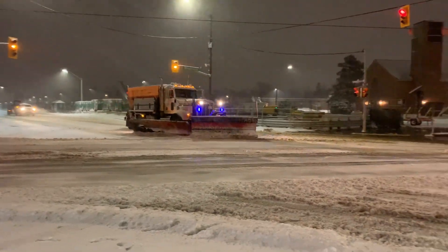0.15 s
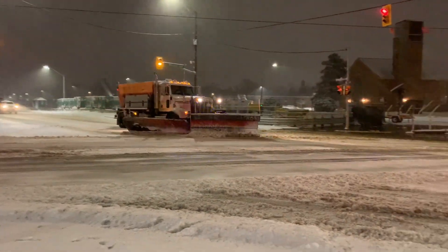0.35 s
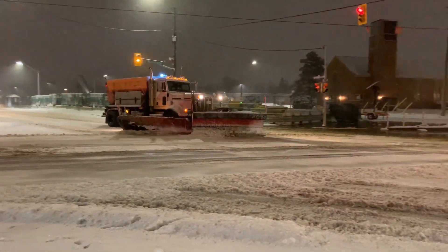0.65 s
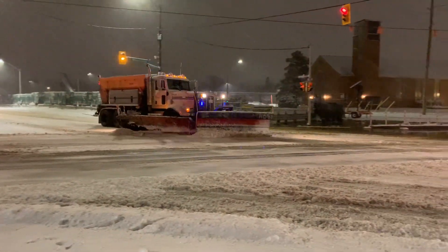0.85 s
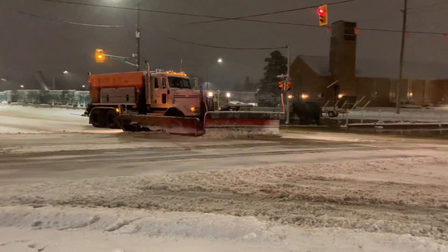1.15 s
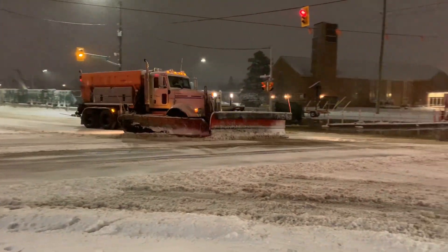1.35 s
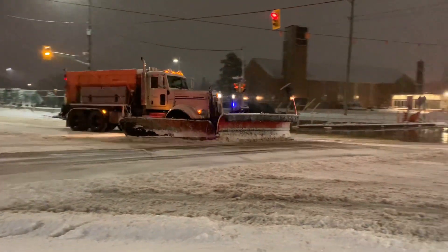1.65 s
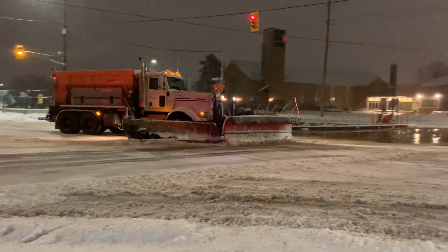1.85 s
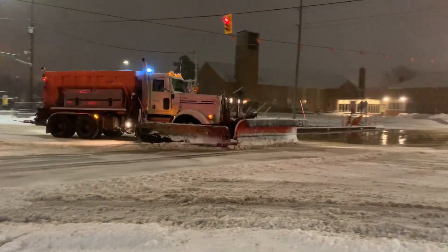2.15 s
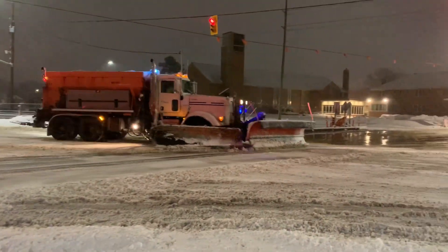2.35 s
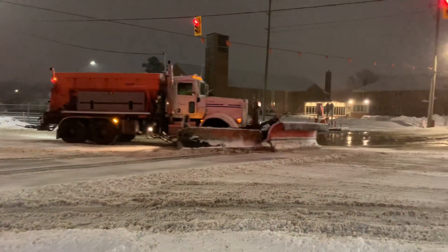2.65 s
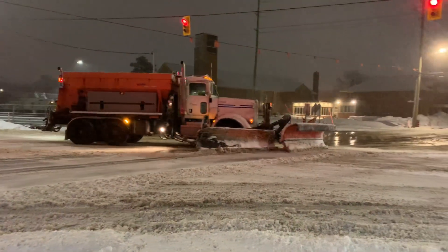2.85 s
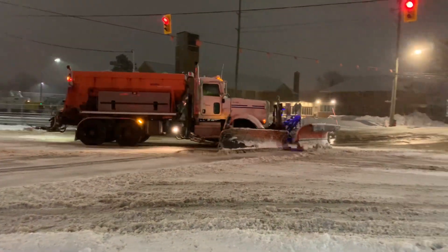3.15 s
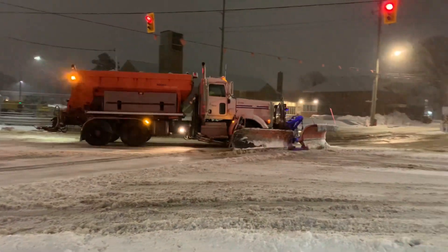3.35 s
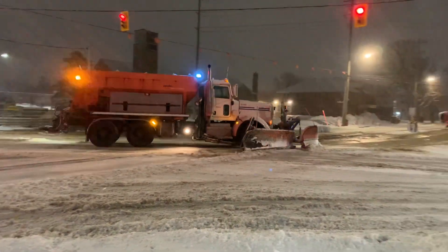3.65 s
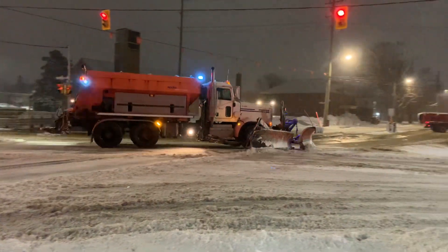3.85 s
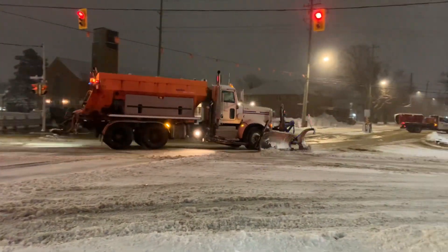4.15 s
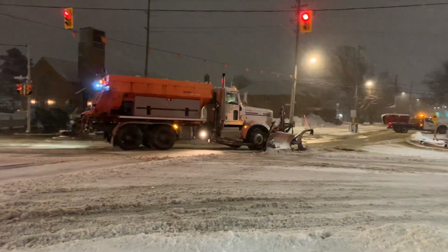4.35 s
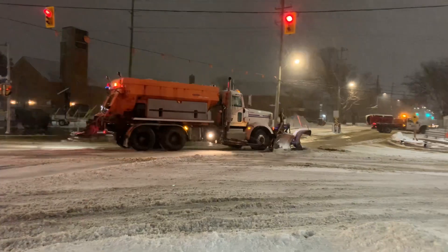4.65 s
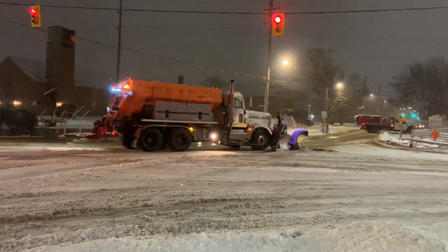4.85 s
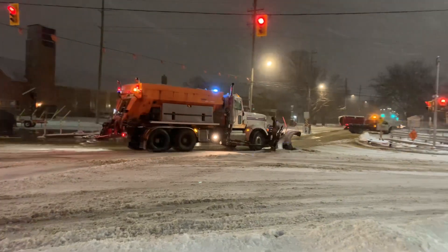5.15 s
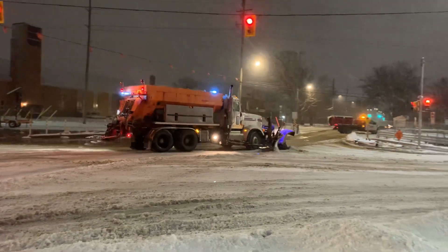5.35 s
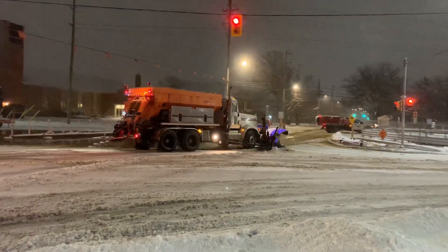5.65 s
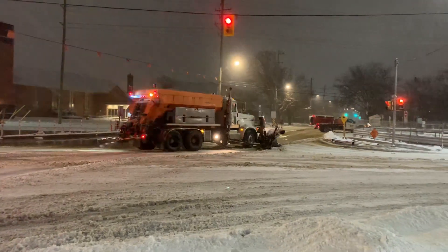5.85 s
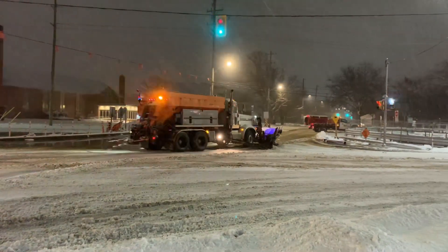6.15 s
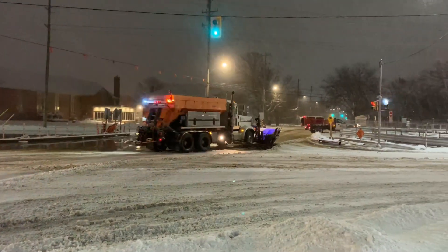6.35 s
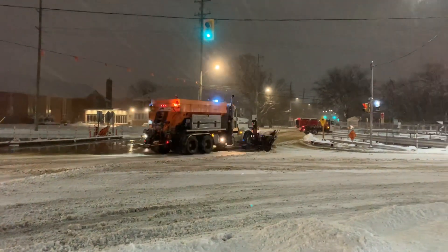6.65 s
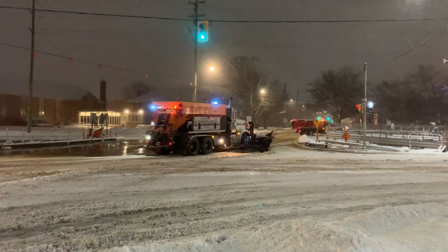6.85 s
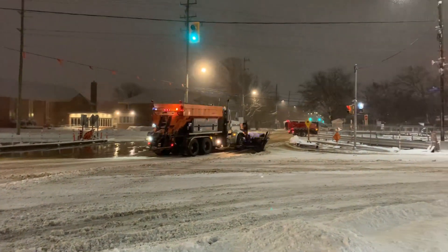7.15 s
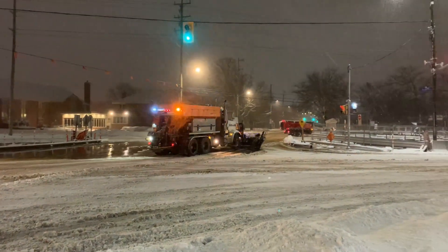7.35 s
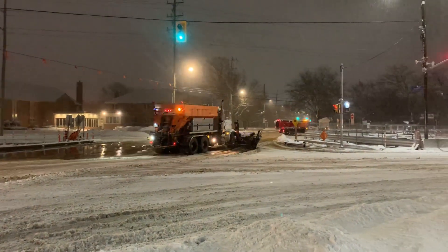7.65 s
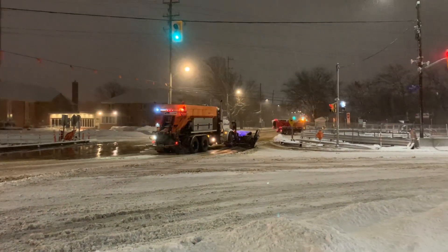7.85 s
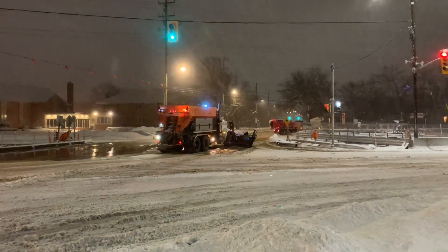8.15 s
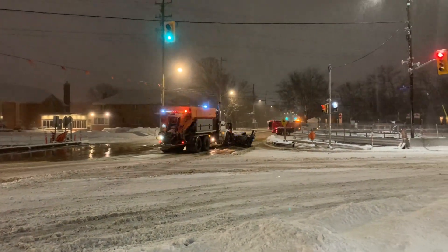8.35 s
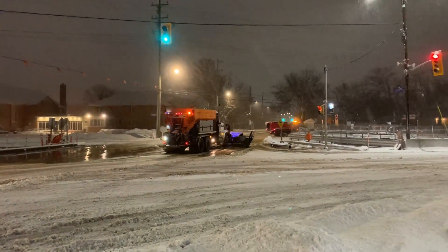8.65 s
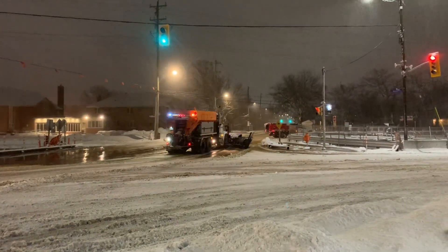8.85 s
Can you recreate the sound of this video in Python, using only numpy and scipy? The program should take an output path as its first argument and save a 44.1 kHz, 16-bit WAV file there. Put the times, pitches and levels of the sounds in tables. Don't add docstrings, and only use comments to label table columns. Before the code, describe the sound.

A phone outdoors on a windy, snowy night picks up a plow truck crossing an intersection. From 0 to 1.3 seconds, violent gusts rumble, crackle and pop on the microphone, mixed with hard blade bangs and coarse steel scraping over grit. From 1.3 to 2.9 the grinding, diesel hiss and spraying snow are steadier over low wind; around 3 another cluster of pops and bangs hits. A few chain clinks follow at 3.2 to 4. At 4.5 an air valve releases a bright, whistling quarter-second blast, with a weak puff at 5.5. Two dry snaps come near 5.4, low plate groans and knocks around 5.8, and chains jingle from 6.3 to 7. Wind pops thin out. From 7.5 to 9 the blade's resonant groaning grows, while a wavering gear whine rises around 320 to 410 hertz, surging as the truck pulls away.

```python
import sys
import numpy as np
from scipy import signal
from scipy.fft import rfft, irfft, next_fast_len
from scipy.io import wavfile
from scipy.ndimage import uniform_filter1d

SR = 44100
rng = np.random.default_rng(int(sys.argv[2]) if len(sys.argv) > 2 else 0)


def boost_factor(decibels):
    exponent = np.asarray(decibels, float) / 20
    return 10 ** exponent


def bounce(signal):
    frames = np.transpose(np.atleast_2d(signal))
    limited = np.clip(frames, -1, 1)
    pcm = np.round(limited * 32767).astype(np.int16)
    wavfile.write(sys.argv[1], SR, pcm)


N = 396459
T = np.arange(N) / SR
SIZE = next_fast_len(N)
HZ = np.fft.rfftfreq(SIZE, 1 / SR)

# [t/s, blade pressure level/dB, engine effort level/dB, thrown snow level/dB]
TRUCK_PATH = [(0, -20, -48.5, -57), (.17, -25, -42, -50.5), (.3, -28, -52, -56), (.55, -26, -53, -51.5),
              (.88, -29, -49, -50), (1.1, -24.5, -49, -49), (2.08, -23.5, -44.5, -48.5),
              (2.4, -27.5, -42.5, -49.5), (3.43, -27, -41, -51.5), (4.21, -30, -40.5, -50),
              (4.7, -27.5, -43.5, -54), (5.3, -25, -42.5, -56), (6.07, -26.5, -48.5, -54),
              (6.85, -27.5, -49, -56), (7.2, -25.5, -44, -61), (7.65, -20, -48.5, -58),
              (8.45, -19.5, -45.5, -47), (9, -19, -51.5, -72)]
# [f/Hz, width f/Hz, level/dB]
PLATE_MODES = [(268, 67, 0.5), (342, 59, 1), (490.6, 54, 1.5), (605, 36, 1.5), (689, 117, -4),
               (159.4, 14, 2)]
# [f/Hz, level/dB]
SCRAPE_TONE = [(470, -25), (800, -5.5), (978, -7.5), (1270, 1), (1540, -9.5), (1770, -5), (2150, -11.5),
               (2390, -8.5), (2660, -14), (2890, -11), (3600, -18), (4680, -25), (7920, -120)]
# [f/Hz, level/dB]
HISS_TONE = [(2500, -37), (3300, -7.5), (4200, -1), (5700, -5), (6800, -5), (7600, -8.5), (8800, -32)]
# [f/Hz, level/dB]
SPRAY_TONE = [(6500, -30), (7600, -10), (8600, -1), (9500, -1), (11000, -2), (12700, -2), (14000, -1),
              (14900, -7)]
# [t/s, rumble level/dB, eddies level/dB]
WIND_LEVELS = [(0, -28.5, -16.5), (.4, -25, -32.5), (.85, -17, -23), (1.4, -20, -24), (1.75, -19.5, -25),
               (2.1, -20.5, -23.5), (2.7, -18.5, -21), (3.4, -14, -33), (4.0, -21, -34), (4.35, -17, -46),
               (4.9, -24.5, -67), (5.6, -24, -45), (6.5, -23.5, -42), (7.1, -22, -27.5), (7.7, -19, -55),
               (8.2, -18.5, -70), (9, -17, -80)]
# [t/s, lift level/dB, half length t/s]
RUMBLE_SWELLS = [(0.21, 13.5, 0.11), (0.12, 3, 0.023), (0.565, 8, 0.082), (.77, 3.5, 0.11),
                 (1.08, 6.5, 0.046), (1.213, 7, 0.042), (1.453, 5.5, 0.088), (1.877, 10, 0.02),
                 (1.902, -14, .02), (1.978, 10, 0.014), (2.247, 7, 0.056), (2.308, -13, 0.022),
                 (2.351, 12, 0.015), (2.54, 6.5, 0.075), (2.765, 4.5, 0.05), (2.987, 4.5, 0.085),
                 (3.242, 3.5, 0.026), (3.62, 3, 0.079), (4.144, 7, 0.055), (4.802, 9, 0.039),
                 (5.027, 13, 0.057), (5.268, 5.5, 0.13), (6.065, 5, 0.068), (6.38, 10, 0.044),
                 (6.611, 9, 0.027), (6.864, 8, 0.074), (7.199, 2.5, 0.024), (7.319, 10, 0.011),
                 (7.99, 2.5, 0.088), (8.457, 4, 0.036)]
# [start t/s, hold t/s, large eddies level/dB, small eddies relative level/dB]
GUST_BURSTS = [(0.005, 0.016, -13, 4), (0.046, 0.0094, -19.5, 10.5), (0.108, 0.038, -19.5, 1),
               (0.173, 0.13, -21.5, 4), (0.168, .006, -20, 6), (0.189, .004, -16, 4),
               (0.219, 0.019, -13.5, 2.5), (0.25, 0.031, -18.5, 7), (0.299, .01, -23, 8),
               (0.312, .006, -16.5, 5), (0.33, .002, -16, -6), (0.458, .02, -22, -6),
               (0.489, 0.06, -13.5, -6), (0.572, 0.035, -17.5, 0), (.612, 0.024, -19, 8),
               (0.651, 0.17, -16.5, -8), (1.029, 0.004, -14.5, 8), (1.058, 0.022, -24.5, 5),
               (1.104, .01, -22, -3), (1.131, 0.043, -25.5, 9.5), (1.183, .006, -9, -0.5),
               (1.212, 0.038, -17.5, -3.5), (1.3, .015, -35, 5), (1.398, 0.023, -33, 6),
               (1.44, 0.037, -34, 9), (1.846, 0.026, -32, 8.5), (2.097, 0.12, -33, 6),
               (2.307, 0.21, -32, -31), (2.942, 0.013, -13.5, 0), (2.969, 0.052, -12, -12),
               (3.061, 0.019, -16.5, -3.5), (3.19, 0.03, -19.5, 0), (3.252, 0.15, -23.5, -10),
               (3.957, 0.034, -35, -20), (4.52, .04, -26.5, -2), (4.758, 0.017, -14, -11),
               (4.971, 0.027, -25.5, 2.5), (5.153, .02, -38, -23), (5.29, 0.045, -25.5, -3),
               (5.504, 0.033, -31, 3.5), (5.804, 0.052, -29, 10), (6.12, 0.037, -30, 6),
               (6.256, 0.067, -34, 5), (6.59, 0.018, -31, -11), (6.758, 0.06, -21, -20),
               (7.09, 0.011, -36, -10)]
# [t/s, pop peak level/dB, thump relative level/dB]
WIND_POPS = [(0.018, 2, -19), (0.06, -3, 0), (0.109, 2, -8), (0.146, -17, -6), (0.174, 3, -8),
             (0.217, -2, -4), (.268, 5, -11), (.316, -3, -8), (0.458, -13, -2), (0.511, -6, 4),
             (.624, -1, -6), (0.741, -3, -5), (0.765, -8, -4), (0.81, -1, -6), (.82, -2, -3),
             (1.040, 7.5, -17), (1.073, -1, -10), (1.192, 1, -8), (1.266, -0.5, -1), (1.392, -5, -1),
             (1.924, -9, -1), (2.951, 3, -6), (3.018, -24, -4), (3.067, -3, -5), (2.812, -18, -4),
             (3.962, -18, -3), (4.398, -15, 0), (4.428, -2.5, 1), (4.719, -8, 3), (4.978, -12, 9),
             (5.026, -4, 11.5), (5.224, -25.5, 20), (5.33, -10, 9), (5.661, -17, -14), (5.72, -14, -10),
             (5.759, -14, -3), (6.219, -7, -10), (6.997, -11, -6), (7.156, -23, -6), (7.927, -10, -10),
             (8.363, -11, -9), (8.519, -14, -8), (8.721, -12, -3)]
# [f/Hz, level/dB]
RUMBLE_COLOUR = [(12, -43), (20, -14), (29, -28), (37, -12.5), (59, 3), (82, 0), (113, -0.5), (197, -10),
                 (300, -24), (390, -54.5), (660, -120)]
# [f/Hz, level/dB]
EDDY_COLOUR = [(40, -14.5), (90, -0.5), (200, 7.5), (400, -0.5), (700, -13), (1200, -15), (2000, -29.5),
               (3500, -48.5), (6000, -95)]
# [t/s, length t/s, level/dB, f/Hz,
# width f/Hz]
BLADE_CATCHES = [(0.001, 0.08, -28, 450, 71), (0.2, 0.11, -30.5, 505, 277), (0.82, 0.12, -38, 401, 199),
                 (2.95, 0.014, -28, 1600, 700), (2.951, 0.014, -29, 2800, 500),
                 (0.59, .035, -32, 1300, 940), (1.14, .04, -28, 1100, 360), (1.302, .03, -31, 1400, 300),
                 (3.548, .2, -30.5, 300, 67), (3.954, 0.074, -29, 200, 56), (6.238, 0.11, -24, 166, 25),
                 (6.8, .05, -29, 220, 97), (6.896, 0.15, -25.5, 376, 95), (2.622, 0.12, -31, 1330, 220),
                 (3.643, 0.14, -38, 1800, 200), (3.8, 0.16, -39, 1850, 200), (8.2, 0.81, -40, 2900, 340),
                 (4.79, 0.051, -28, 402, 230), (4.713, 0.022, -21, 650, 73), (4.977, 0.036, -22, 450, 250),
                 (5.268, 0.03, -26, 555, 150), (5.303, .03, -31, 530, 160), (5.8, 0.056, -36, 1400, 1200),
                 (5.662, .06, -41, 680, 200), (5.81, 0.21, -19.5, 330, 73), (5.305, 0.037, -23, 460, 190),
                 (1.9, 0.28, -29, 680, 250), (0.684, 0.19, -26, 410, 140), (0.01, .08, -29, 720, 250),
                 (3.4, .2, -27, 266, 83), (6.276, 0.044, -32, 1700, 1400), (7.142, 0.12, -23.5, 390, 45),
                 (7.757, 1.2, -22, 303, 81), (7.79, 0.12, -24, 530, 139), (7.8, 0.44, -26, 602, 60),
                 (8.248, 0.15, -36, 295, 60), (8.35, 0.16, -24, 600, 50), (8.67, 0.1, -25.5, 590, 61)]
# [t/s, peak level/dB, f/Hz, 60 dB
# decay t/s]
SHORT_BANGS = [(.016, -7, 330, .07), (.056, -9, 540, .06), (.198, -3, 240, .045), (.226, -6, 460, .08),
               (.274, -6, 300, .05), (.286, -7, 520, .05), (.33, -7, 280, .04), (.816, -5, 280, .04),
               (1.041, -2, 280, .04), (1.116, -8, 200, .04), (1.194, -5, 320, .05), (1.922, -14, 560, .04),
               (2.953, -2, 210, .05), (2.976, -5, 190, .05), (3.068, -13, 540, .04), (3.962, -16, 560, .04),
               (4.398, -19, 710, .04), (4.978, -14, 430, .07), (5.027, -15, 450, .05),
               (5.29, -16, 545, .11), (5.33, -9, 330, .06), (5.66, -17, 600, .05), (5.758, -17, 490, .05),
               (5.83, -15, 365, .1), (5.85, -15, 310, .1), (5.875, -12, 330, .12), (5.91, -15, 345, .11),
               (5.96, -18, 320, .07), (6.997, -18, 540, .04), (7.926, -15, 700, .04)]
# [t/s, peak level/dB, ring f/Hz, 60 dB decay t/s, knock relative level/dB]
CHAIN_LINKS = [(3.249, -40, 6550, 0.042, 12), (3.439, -25, 6230, 0.027, 0), (3.973, -30, 10350, 0.083, 11),
               (5.3677, -49, 6500, 0.03, 8), (5.4216, -40, 6240, 0.05, 5), (5.8326, -40, 10700, 0.05, -8),
               (5.8694, -38, 10300, 0.05, -6), (5.9115, -37, 10400, 0.058, -24),
               (6.271, -27, 6670, .03, -6), (6.273, -25, 9980, 0.12, 7.5), (6.3984, -37, 10500, 0.03, 13),
               (6.4178, -36, 7300, 0.043, 9), (6.4577, -31, 10400, 0.046, -7),
               (6.519, -39.5, 7440, 0.044, 16), (6.556, -40, 7350, .04, 4), (6.9426, -40, 7410, 0.05, 13),
               (7.026, -28.5, 7440, 0.046, 6), (7.028, -36, 10800, .04, -6), (7.9718, -33, 10400, 0.04, -6)]
# [start t/s, hold t/s, nozzle level/dB, top hiss level/dB]
BLOW_OFFS = [
    (4.485, 0.17, -25.5, -29.5),
    (5.515, 0.075, -44.5, -46),
    (4.462, .001, -48, -44),
    (4.685, .012, -38.5, -47),
]
# [f/Hz, level/dB]
JET_TONE = [(800, -21), (1230, -11), (1500, -6), (1950, -16), (2500, -7), (3100, -2), (3650, 1.5),
            (6500, -5.5), (8200, -11), (9500, -27)]
# [t after opening/s, half length t/s, f/Hz, width f/Hz, level/dB]
NOZZLE_WHISTLES = [
    (0.021, .015, 1224, 45, -6),
    (0.054, 0.035, 1230, 46, -11),
    (0.041, 0.026, 2700, 220, -10),
    (.055, .025, 3700, 110, -16),
    (.095, 0.017, 3000, 90, -14),
    (0.096, 0.033, 1950, 63, -10),
    (0.083, 0.034, 2600, 80, -9.5),
    (.17, 0.024, 2600, 150, -25),
]
# [t/s, peak level/dB, left minus right level/dB]
PIN_SNAPS = [
    (5.3682, -20, 2.5),
    (5.4211, -27, -3),
]
# [t/s, f/Hz]
GEAR_PITCH = [(7.4, 318), (7.75, 341), (7.95, 356), (8.15, 382), (8.4, 404), (8.6, 412), (8.8, 408),
              (9, 399)]
# [t/s, level/dB, half length t/s]
LOAD_SURGES = [
    (7.58, -28, .06),
    (7.72, -20, .08),
    (7.94, -18, .05),
    (8.05, -25, .04),
    (8.14, -21, .045),
    (8.3, -29, .04),
    (8.5, -27, .09),
    (8.62, -30, .05),
    (8.8, -25, .08),
    (8.93, -28, .05),
]
# [start t/s, hold t/s, level/dB]
WHINE_OCTAVES = [
    (7.45, .2, -26),
    (8.87, .2, -32),
]
# [f/Hz, likeness 0-1, left lead/rad, left minus right level/dB]
PORT_MATCH = [(150, .6, -2., -1), (280, .75, -1.3, -1), (450, .85, -.5, -3), (850, .75, -.5, -2.5),
              (1200, .85, -.1, -2), (1800, .75, -.2, -1.5), (2700, .68, .5, -2), (3310, .6, np.pi, -1.5),
              (3900, .4, 2.5, -3), (5500, .35, 2.5, -3.5), (6300, .3, .6, -1.5)]
# [t/s, f/Hz]
MONO_EDGE = [(0, 260), (.35, 360), (.9, 410), (2, 390), (3, 390), (3.5, 300), (4, 170), (4.5, 105), (7, 80),
             (7.6, 60), (9, 45)]
# [t/s, f/Hz, side level/dB]
OPPOSED_BAND = [(3.5, 200, -7), (4.8, 180, 7.5), (5.8, 198, 5), (6.9, 186, 9), (7.6, 129.5, 9),
                (8.2, 123, 14.5), (9, 110, 16)]


def along(table, off=None):
    s, *cols = np.transpose(table)
    return [np.interp(T, s, c, off, off) for c in cols]


def across(table):
    hz, *cols = np.transpose(table)
    return [np.interp(np.log(HZ + 1), np.log(hz), c) for c in cols]


def unit(x):
    return x / np.sqrt(np.mean(x ** 2))


def colour(x, tone):
    cep = irfft(across(tone)[0] * np.log(10) / 20, SIZE)
    cep[1:SIZE // 2] *= 2
    cep[SIZE // 2 + 1:] = 0
    return irfft(rfft(x, SIZE) * np.exp(rfft(cep)), SIZE)[:N]


def ring(x, modes):
    out = np.zeros(N)
    for k, (hz, width, db) in enumerate(modes):
        peak = signal.iirpeak(hz, hz / width, SR)
        out += boost_factor(db) * signal.lfilter(*peak, np.roll(x, 701 * k))
    return out


def walk(rate):
    k = int(SR / rate)
    steps = np.repeat(rng.standard_normal(N // k + 1), k)
    return unit(uniform_filter1d(uniform_filter1d(steps, k), k)[:N])


def grit(rate, spread_db):
    where, sign, size = rng.random((3, N))
    return (where < rate / SR) * np.sign(sign - 0.5) * boost_factor(-spread_db * np.log(1.02 - size))


def burst(start, rise, hold, fall):
    u = T - start
    attack = np.sin(np.pi / 2 * np.clip(u / rise, 0, 1)) ** 2
    return attack * np.exp(-np.maximum(u - rise - hold, 0) / fall)


def bump(centre, half):
    return np.exp(-((T - centre) / half) ** 2)


def truck():
    firing_hz, scrape_under_db, scrape_per_effort = 64.4, -8, 0.6
    body_db, hiss_db, spray_db = along(TRUCK_PATH)
    scrape_db = body_db + scrape_under_db + scrape_per_effort * (hiss_db - np.mean(hiss_db))
    cycle = np.cumsum(firing_hz * (1 + 0.031 * walk(7.9)) / SR) % 1
    beat = 1 + 0.5 * np.exp(-cycle / 0.037)
    body = unit(ring(grit(2500, 2.9) * boost_factor(1.7 * walk(25)), PLATE_MODES))
    scrape = unit(colour(grit(6000, 1.76) * beat * boost_factor(1.4 * walk(15)), SCRAPE_TONE))
    hiss = unit(colour(rng.standard_normal(N) * beat * boost_factor(1.5 * walk(12)), HISS_TONE))
    spray = unit(colour(grit(9000, 1.5) * beat * boost_factor(1.2 * walk(18)), SPRAY_TONE))
    blade = body * boost_factor(body_db) + scrape * boost_factor(scrape_db)
    return blade + hiss * boost_factor(hiss_db + 0.5) + spray * boost_factor(spray_db + 6.5)


def wind_pops():
    start_hz, slide_s, decay_s = 1700, 0.0016, 0.0045
    pops, thumps = np.zeros((2, N))
    for s, db, thump_db in WIND_POPS:
        pops[int(s * SR)] = boost_factor(db)
        thumps[int(s * SR)] = boost_factor(db + thump_db)
    t = T[:2000]
    slide = np.sin(2 * np.pi * start_hz * slide_s * np.log(1 + t / slide_s))
    slide = slide * np.exp(-t / decay_s) * (1 - np.exp(-t / 0.001))
    thud = np.sin(2 * np.pi * 90 * t) * np.exp(-t / 0.017)
    pop = signal.fftconvolve(pops, slide)[:N]
    thump = signal.fftconvolve(thumps, thud)[:N]
    return 0.41 * pop + 0.5 * thump


def wind():
    rise_s, fall_s, calm_bright_db = 0.0093, 0.011, -3
    rumble_db, calm_db = along(WIND_LEVELS)
    rumble_db = rumble_db + sum(db * bump(s, half) for s, db, half in RUMBLE_SWELLS)
    large, fine = boost_factor(calm_db), boost_factor(calm_db + calm_bright_db)
    for s, hold, db, bright_db in GUST_BURSTS:
        blow = burst(s, rise_s, hold, fall_s)
        large = large + boost_factor(db) * blow
        fine = fine + boost_factor(db + bright_db) * blow
    pops = wind_pops()
    low, high = (signal.butter(3, 400, kind, fs=SR, output="sos") for kind in ("low", "high"))
    out = []
    # (rumble dB, gust dB, share of the pops)
    for rumble_share_db, gust_share_db, pop_share in ((1.47, 0.0, 0.92), (-11.5, -9.0, 0.2)):
        rumble = unit(colour(rng.standard_normal(N), RUMBLE_COLOUR)) * boost_factor(rumble_db + rumble_share_db)
        eddies = unit(colour(grit(3000, 5.9) * boost_factor(2.73 * walk(30)), EDDY_COLOUR))
        crackle = unit(colour(grit(1300, 3.4) * boost_factor(3.76 * walk(25)), EDDY_COLOUR))
        small = unit(signal.sosfilt(high, crackle)) * fine
        gust = 1.22 * unit(signal.sosfilt(low, eddies)) * large + small
        out.append(rumble + gust * boost_factor(gust_share_db - 2.5) + pop_share * pops)
    mid, side = out
    side = side + 0.27 * signal.sosfilt(high, mid)
    return mid + side * np.array([[1], [-1]])


def catches():
    out, chatter = np.zeros(N), grit(4000, 2.6)
    for s, length, db, hz, width in BLADE_CATCHES:
        part = slice(int(s * SR), int((s + 2 * length) * SR))
        u = (T[part] - s) / length
        peak = signal.iirpeak(hz, hz / width / 1.5, SR)
        tone = signal.lfilter(*peak, signal.lfilter(*peak, chatter[part]))
        out[part] += boost_factor(db) * unit(tone) * np.minimum(8 * u, 1) * np.exp(-u ** 3)
    return out


def bangs():
    out, t = np.zeros(N + 6000), T[:6000]
    for s, db, hz, t60 in SHORT_BANGS:
        tone = np.sin(2 * np.pi * hz * t) + 0.21 * np.sin(2 * np.pi * 1.63 * hz * t)
        envelope = (1 - np.exp(-t / 0.00069)) * np.exp(-np.log(1000) * t / max(t60, 0.01))
        start = int(s * SR)
        out[start:start + len(t)] += boost_factor(db) * tone * envelope
    return out[:N]


def clinks():
    out, t = np.zeros(N + 4000), T[:4000]
    rise = 1 - np.exp(-t / 0.002)
    draws = rng.random((len(CHAIN_LINKS), 2, 7, 1))
    for (s, db, hz, t60, knock_db), (detune, phase) in zip(CHAIN_LINKS, draws):
        partials = np.sin(2 * np.pi * (hz * (0.95 + 0.13 * detune) * t + phase))
        tones = 0.65 * partials.sum(axis=0) * np.exp(-np.log(1000) * t / max(t60, 0.01))
        knock = boost_factor(knock_db) * rng.standard_normal(len(t)) * np.exp(-t / 0.0042)
        start = int(s * SR)
        out[start:start + len(t)] += boost_factor(db) * rise * (tones + knock)
    return out[:N]


def valves():
    rise_s, fall_s, sag_db_per_s = 0.03, 0.014, -18
    air = rng.standard_normal(N) * boost_factor(0.38 * walk(60))
    jet, top, sputter = unit(colour(air, JET_TONE)), unit(colour(air, SPRAY_TONE)), walk(45)
    tones = [unit(ring(air, [(hz, width, 0)])) * boost_factor(db) for _, _, hz, width, db in NOZZLE_WHISTLES]
    out = np.zeros(N)
    for s, hold, nozzle_db, top_db in BLOW_OFFS:
        late = np.clip(T - s, 0, 0.5)
        blow = burst(s, rise_s, hold, fall_s) * boost_factor(sag_db_per_s * late + 5 * late * sputter)
        pipe = jet.copy()
        for tone, (after, half, *_) in zip(tones, NOZZLE_WHISTLES):
            pipe += tone * bump(s + after, half)
        out += blow * (pipe * boost_factor(nozzle_db + 6.5) + top * boost_factor(top_db + 13.0))
    return out


def ticks():
    out, t = np.zeros((2, N)), T[:400]
    for s, db, pan_db in PIN_SNAPS:
        snap = rng.standard_normal(len(t)) * np.exp(-t / 0.0012)
        start = int(s * SR)
        out[:, start:start + len(t)] = boost_factor(db + np.array([[pan_db], [-pan_db]]) / 2) * snap
    return signal.sosfilt(signal.butter(2, (1500, 7500), "band", fs=SR, output="sos"), out)


def whine():
    start_s, steady_db, left_lag_rad = 7.45, -30, 0.9
    turn = 2 * np.pi * np.cumsum(along(GEAR_PITCH)[0] * (1 + 0.004 * walk(30))) / SR
    turn = turn + left_lag_rad / 2 * np.array([[-1], [1]])
    level = boost_factor(steady_db) * burst(start_s, 0.17, 2, 1)
    level = level + sum(boost_factor(db) * bump(s, half) for s, db, half in LOAD_SURGES)
    octave = sum(boost_factor(db) * burst(s, 0.044, hold, 0.025) for s, hold, db in WHINE_OCTAVES)
    flutter = boost_factor(walk(30))
    return 1.45 * flutter * (level * np.sin(turn) + octave * np.sin(2 * turn + 0.4 * walk(40)))


def ports(x, least=0.0, scatter=0.28):
    split_hz, treble_lag_s = 6500, 10 / 44100
    like, lead, pan_db = across(PORT_MATCH)
    like = np.clip(like, least * np.clip(-np.cos(lead), 0, 1) ** 3, 1)
    frames = signal.stft(x, nperseg=512, noverlap=384)[2]
    frames = frames * np.exp(2j * np.pi * rng.random(frames.shape))
    scattered = signal.istft(frames, nperseg=512, noverlap=384)[1][:N]
    scattered = rfft(unit(scattered) * np.std(x), SIZE)
    direct = rfft(x, SIZE)
    low = 1 / (1 + (HZ / split_hz) ** 16)
    late = np.exp(-2j * np.pi * HZ * treble_lag_s)
    left = (low * boost_factor(pan_db / 2) * np.exp(1j * lead) - (1 - low) * late) * direct
    right = low * boost_factor(-pan_db / 2) * (like * direct + np.sqrt(1 - like ** 2) * scattered)
    right = right + (1 - low) * (direct + scatter * scattered)
    return irfft(np.array([left, right]), SIZE)[:, :N]


def scene():
    far = ports(truck() + catches() + clinks())
    air = ports(valves(), least=0.99, scatter=0.1)
    return far + wind() + bangs() + air + ticks() + whine()


def band_limit(x):
    return signal.sosfilt(signal.butter(12, 16410, fs=SR, output="sos"), x)


def record(dry):
    top_hz, opposed_octaves, opposed_mid_db = 15050, 0.44, -5.5
    rounded = 1.127 * np.tanh(dry / 1.325)
    hz, s, (left, right) = signal.stft(rounded, SR, nperseg=2048)
    hz = hz[:, None] + 1
    edge_hz = np.interp(s, *np.transpose(MONO_EDGE)) * (1 + 0.1 * np.interp(s, T, walk(20)))
    free = 1 / (1 + (edge_hz / hz) ** 24)
    when, *cols = np.transpose(OPPOSED_BAND)
    centre_hz, side_db = (np.interp(s, when, c) for c in cols)
    opposed = free * np.exp(-(np.log2(hz / centre_hz) / opposed_octaves) ** 2 / 2)
    mid = (left + right) / 2 * boost_factor(opposed_mid_db * opposed)
    side = (left - right) / 2 * boost_factor(side_db * opposed) * free
    both = np.array([mid + side, mid - side]) * (hz < top_hz)
    mix = signal.istft(both, SR, nperseg=2048)[1][:, :N]
    return band_limit(mix)


dry = scene()
out = record(dry)
bounce(out)
```